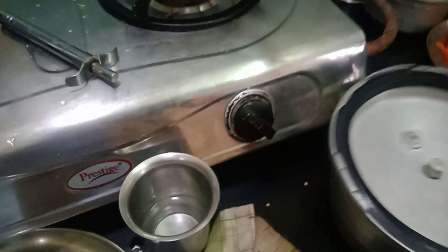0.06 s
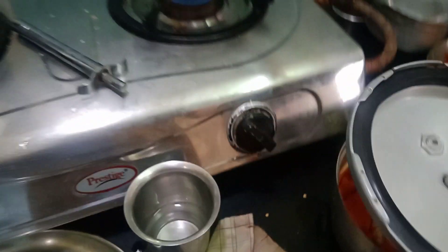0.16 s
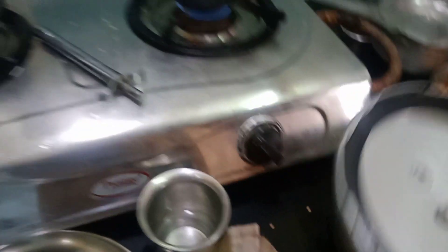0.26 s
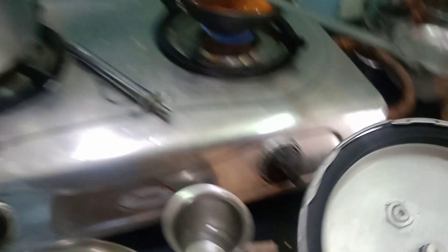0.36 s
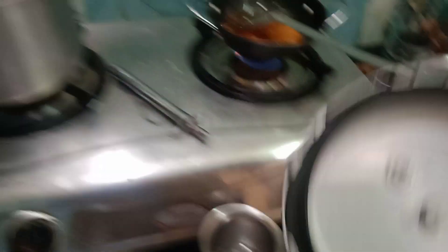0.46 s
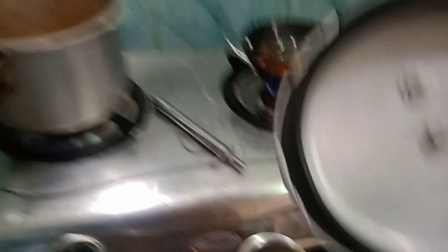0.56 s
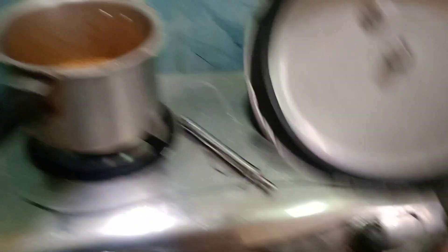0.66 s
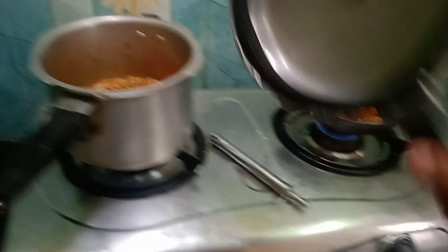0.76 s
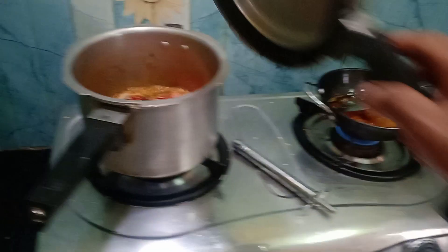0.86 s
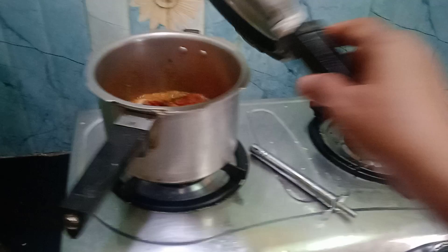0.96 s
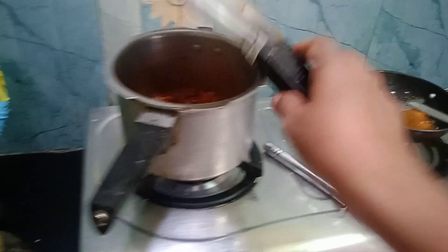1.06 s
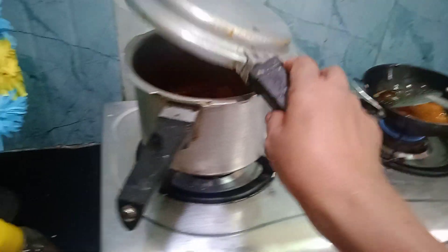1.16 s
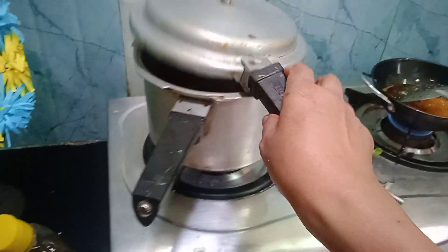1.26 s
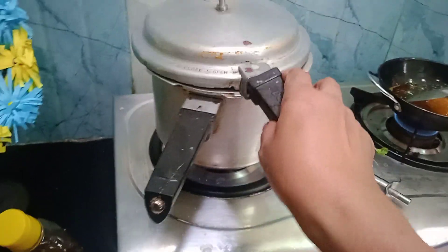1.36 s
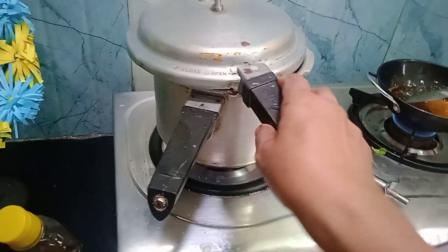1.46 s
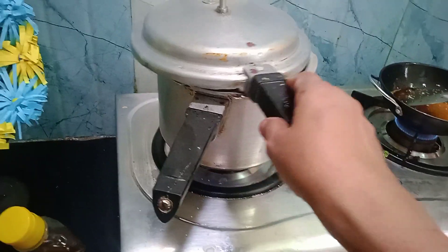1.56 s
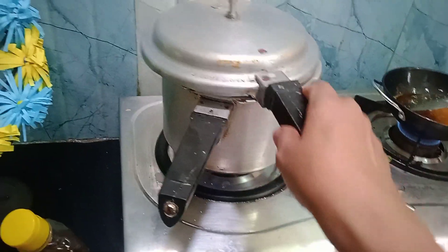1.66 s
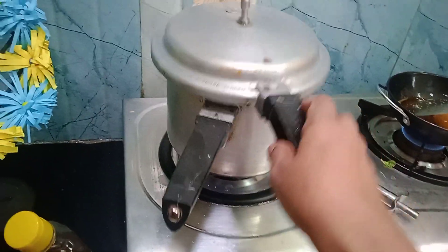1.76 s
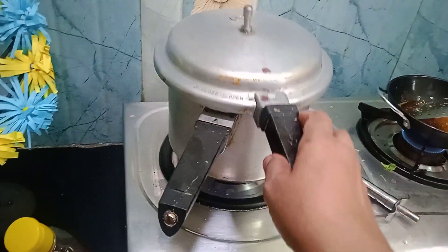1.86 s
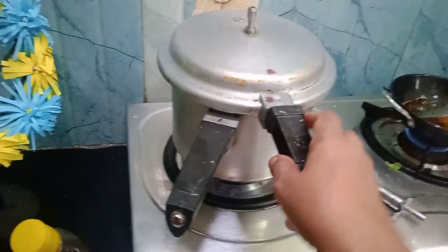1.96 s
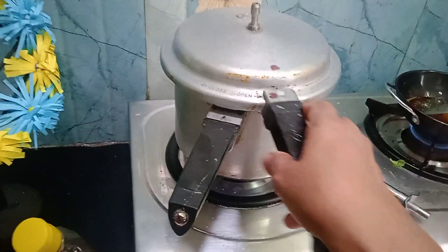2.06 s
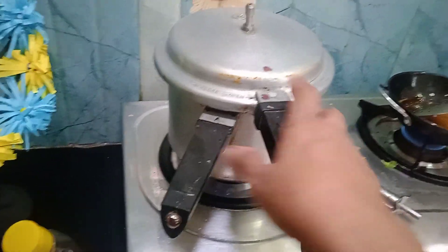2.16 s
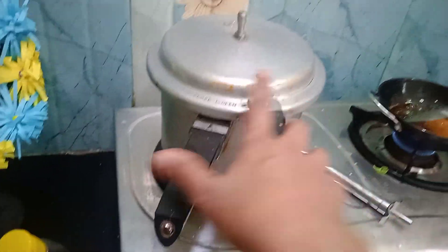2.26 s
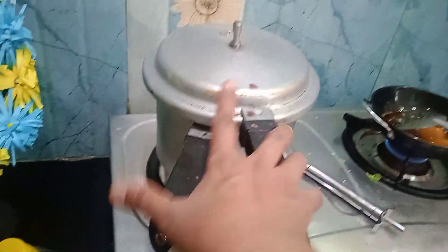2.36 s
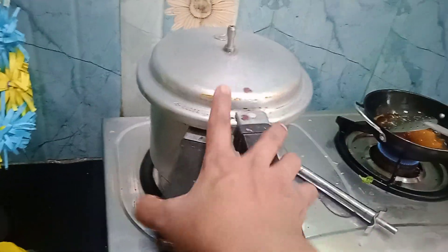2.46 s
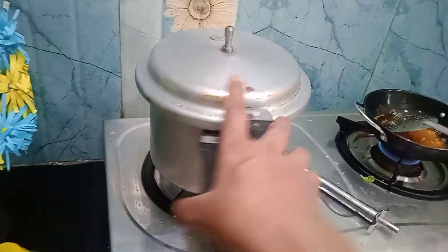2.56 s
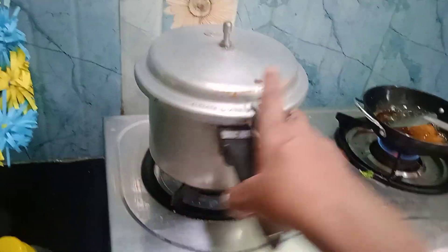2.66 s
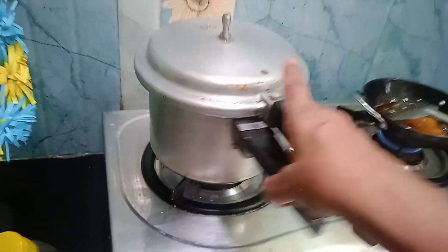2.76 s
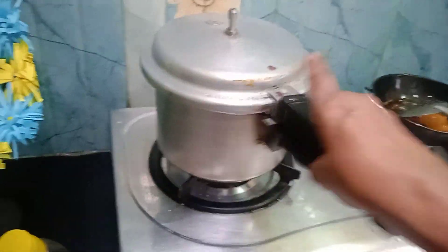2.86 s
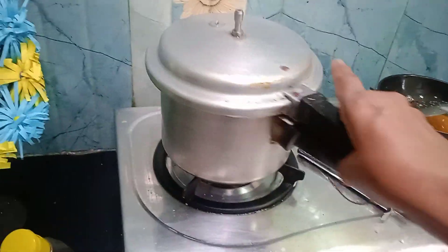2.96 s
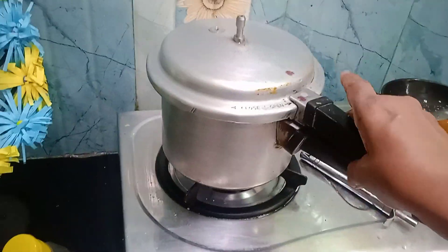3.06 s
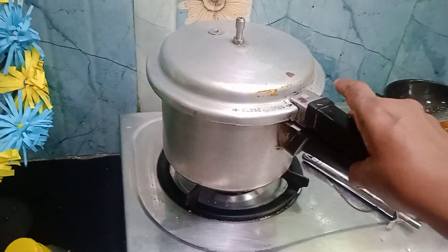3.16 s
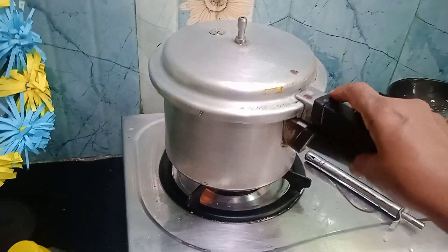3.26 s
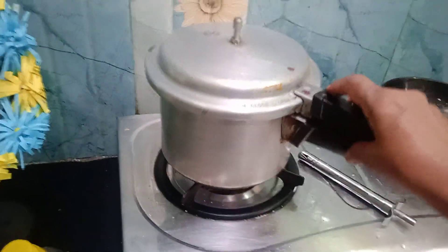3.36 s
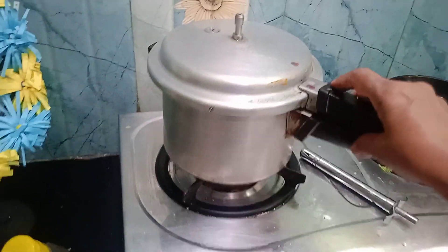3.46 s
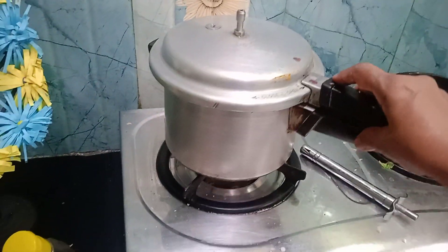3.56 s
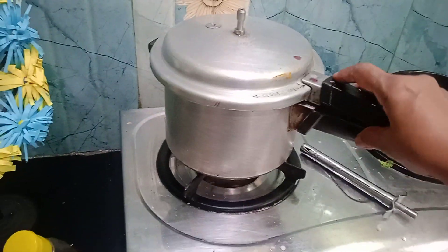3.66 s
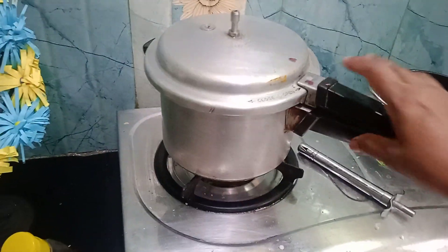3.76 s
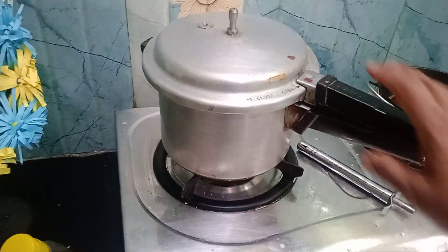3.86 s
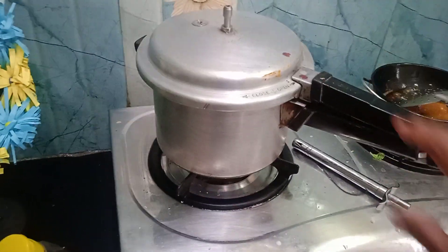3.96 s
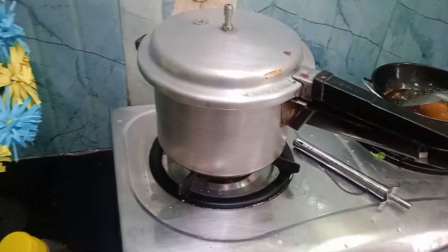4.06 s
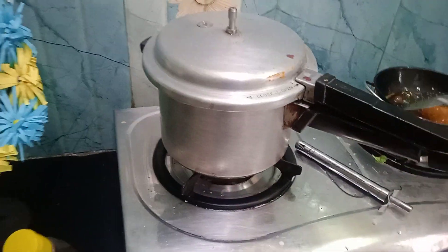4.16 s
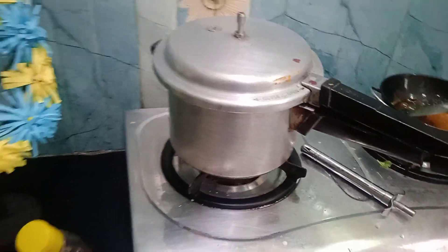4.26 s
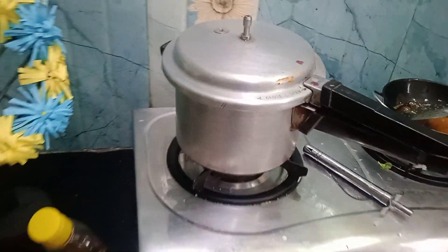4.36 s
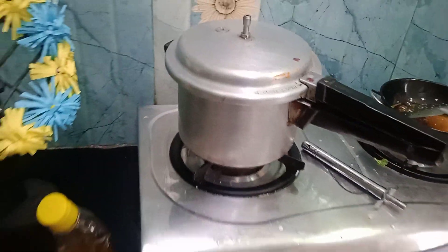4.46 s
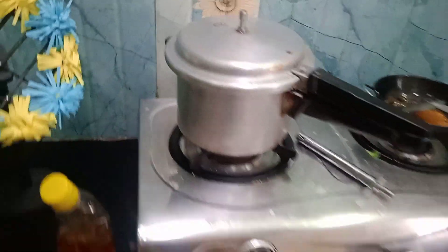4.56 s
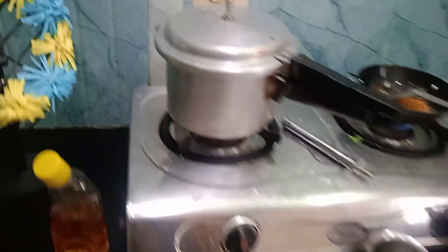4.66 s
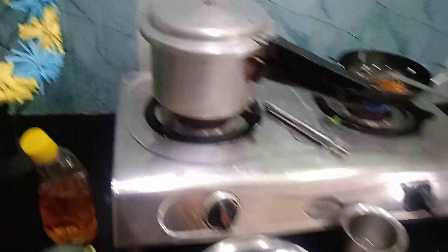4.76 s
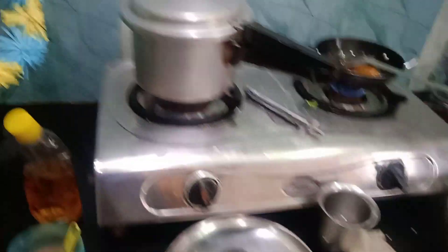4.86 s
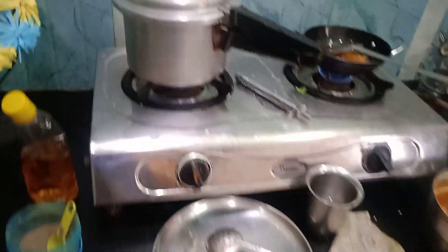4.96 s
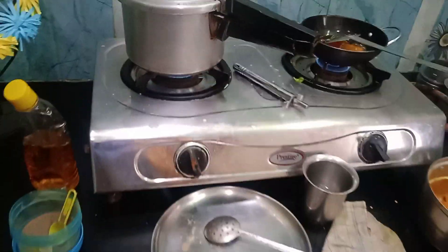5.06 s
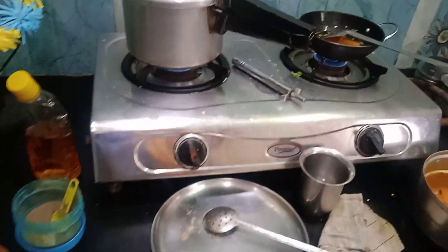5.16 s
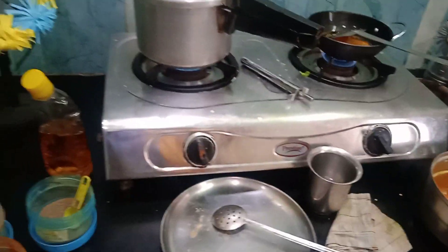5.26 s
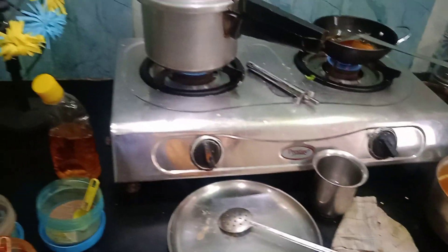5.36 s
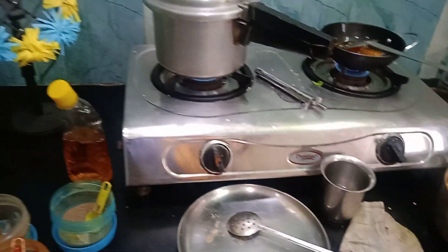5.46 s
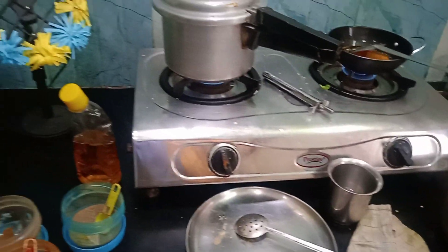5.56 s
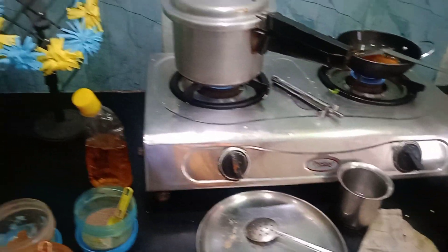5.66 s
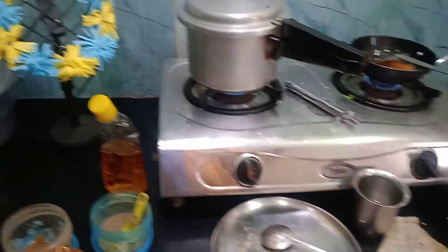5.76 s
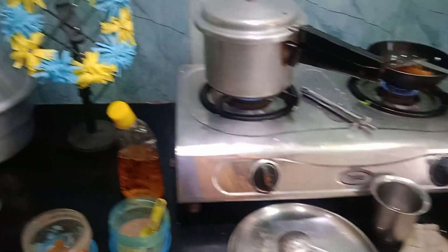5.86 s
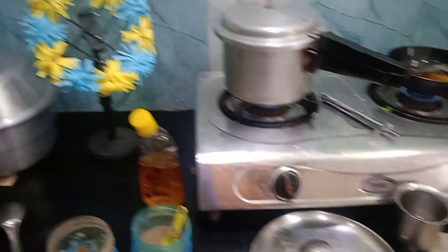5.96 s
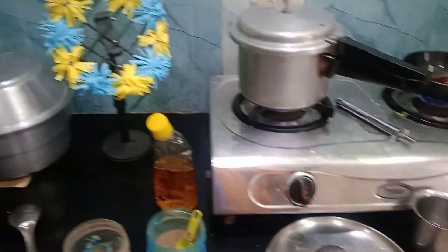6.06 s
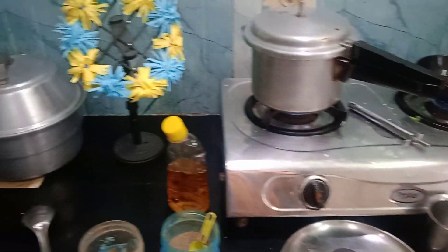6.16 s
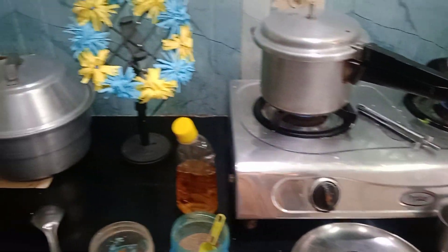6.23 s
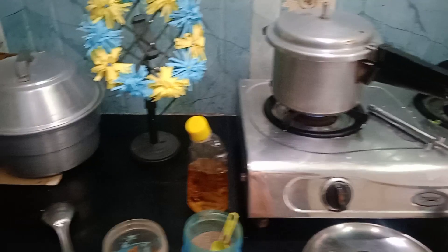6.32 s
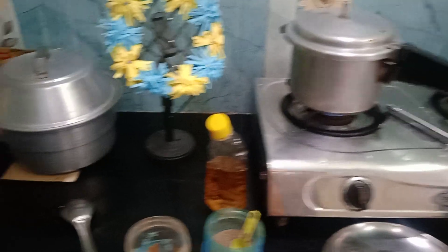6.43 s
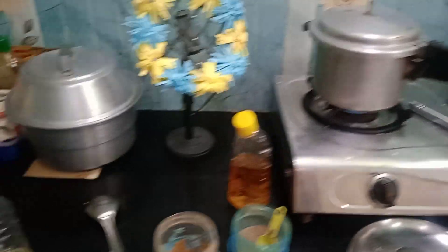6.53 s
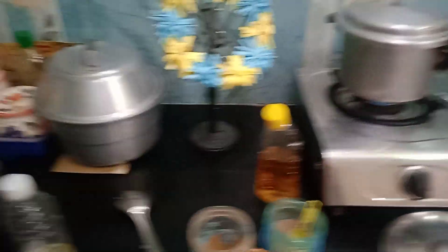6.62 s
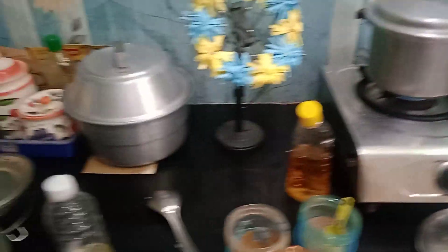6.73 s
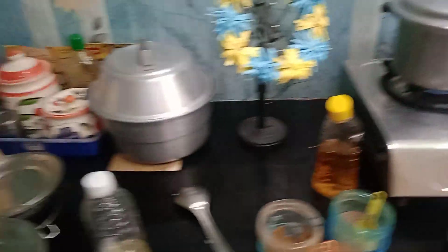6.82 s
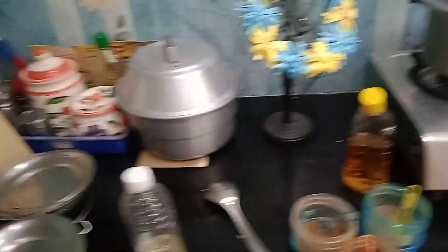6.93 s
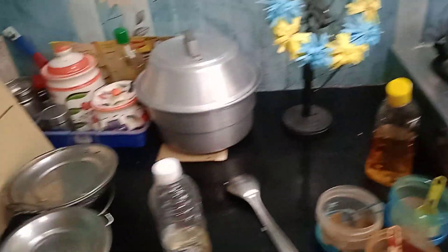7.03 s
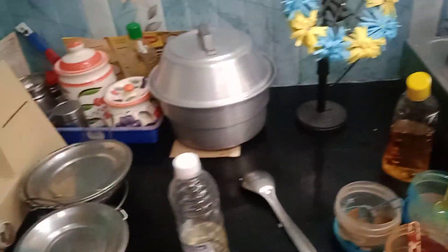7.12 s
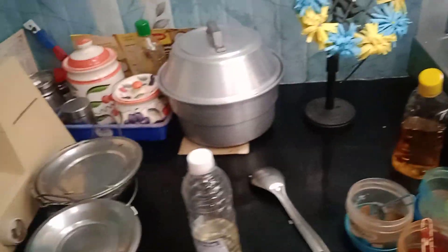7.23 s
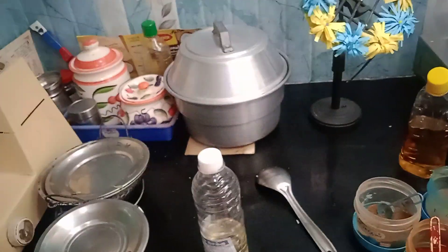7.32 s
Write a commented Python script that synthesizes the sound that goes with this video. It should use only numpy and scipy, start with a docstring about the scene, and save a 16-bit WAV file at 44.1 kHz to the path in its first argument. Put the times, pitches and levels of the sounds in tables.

```python
"""A small tiled kitchen: an aluminium pressure cooker lid is picked up, clanked onto its pot,
seated and twisted shut. Every blow rings the metal and the room; the lugs scrape, the rubber gasket
rubs and snaps, and the handles knock together. A pan sizzles on the next burner throughout,
over faint background noise and a few far-off knocks."""
import sys
import numpy as np
from scipy import signal
from scipy.fft import rfft, irfft, next_fast_len
from scipy.io import wavfile
from scipy.ndimage import uniform_filter1d

SR = 44100
rng = np.random.default_rng(int(sys.argv[2]) if len(sys.argv) > 2 else 0)


def inscribe(sig):
    """Save sig as 16-bit PCM at rate SR to the path in sys.argv[1].

    A 1-D sig is mono; a 2-D sig holds one channel per row.
    Samples are clipped to [-1, 1] before scaling.
    """
    pcm = np.round(np.clip(np.atleast_2d(sig).T, -1, 1) * 32767)
    wavfile.write(sys.argv[1], SR, pcm.astype(np.int16))


N = 325899
TAIL = 32000  # samples in one hit and its decay
T = np.arange(N) / SR
AGE = T[:TAIL]  # seconds since a hit


def undb(db):
    """Decibels to gain."""
    return 10 ** (np.asarray(db) / 20)


def unit(x):
    """Scale to rms 1."""
    return x / np.sqrt(np.mean(x ** 2) + 1e-30)


def freqs(x):
    """Frequencies of the spectrum of x, floored at 1 Hz."""
    return np.maximum(np.fft.rfftfreq(next_fast_len(len(x)), 1 / SR), 1)


def shape(x, gain):
    """Filter x by a gain for each frequency."""
    size = next_fast_len(len(x))
    return irfft(rfft(x, size) * gain, size)[:len(x)]


def colour(x, points):
    """EQ x along a curve of (Hz, dB) points."""
    hz, db = np.transpose(points)
    return shape(x, undb(np.interp(np.log(freqs(x)), np.log(hz), db)))


def noise_band(length, hz, width_hz):
    """Noise through one resonance, rms 1."""
    noise = rng.standard_normal(length)
    return unit(shape(noise, 1 / (1 + ((freqs(noise) - hz) / (width_hz / 2)) ** 2)))


def fade(t60_s):
    """Free decay, 60 dB down after t60_s."""
    return np.exp(-np.log(1000) * AGE / t60_s)


def swell(attack_s):
    """Rounded attack of a hit."""
    return 1 - np.exp(-AGE / attack_s)


def drift(rate_hz):
    """Slow random wander, spread near 1."""
    hold = int(SR / rate_hz)
    steps = np.repeat(rng.standard_normal(N // hold + 1), hold)
    return 1.2 * uniform_filter1d(steps, hold)[:N]


def clicks(per_s, spread_db):
    """Random tiny impacts, a few much stronger than the rest."""
    impacts = (rng.random(N) < per_s / SR) * rng.standard_normal(N)
    return unit(impacts * undb(spread_db * np.minimum(rng.exponential(size=N), 4)))


def add(out, start_s, sound):
    """Mix a sound in at a time."""
    i = max(int(start_s * SR), 0)
    out[i:i + len(sound)] += sound[:N - i]


def background_noise():
    """Faint low background noise that wavers unevenly, band by band."""
    # spectrum of the noise: freq_hz, level_db
    noise_eq = [(24, -43), (40, -17), (65, -1.5), (145, -4), (172, -2.5), (271, -2), (336, -1.5),
                (503, -16), (692, -7.5), (846, -3.5), (1200, -3), (1290, -8.5), (1500, -23.5), (2200, -20),
                (2860, -48), (4840, -120)]
    noise, out = colour(rng.standard_normal(N), noise_eq), 0
    octave = np.log2(freqs(noise))
    for centre in np.arange(5, 12, .5):
        band = shape(noise, np.maximum(1 - 2 * abs(octave - centre), 0))
        out += band * undb(8.2 * drift(rate_hz=5.8))
    return undb(-73.5) * unit(out)


def faint_tones():
    """Unsteady, breathy tones that come and go in the background."""
    # bands of pitched noise: start_s, end_s, pitch_hz, width_hz, level_db
    tones = [(0.28, 1.176, 565, 380, -68.5), (0.28, 1.174, 1566, 290, -70), (4.15, 4.691, 1010, 130, -79),
             (5.165, 5.9, 804, 47, -83.5), (5.85, 6.2, 4490, 1000, -63.5), (5.9, 7.377, 700, 75, -81.5),
             (5.101, 5.6, 147, 11, -85), (6.3, 7.0, 149.5, 13, -78)]
    out = 0
    for start_s, end_s, pitch_hz, width_hz, level_db in tones:
        gate = uniform_filter1d(1. * ((T > start_s) & (T < end_s)), size=4000)
        out += undb(level_db + 2.5 * drift(rate_hz=12)) * gate * noise_band(N, pitch_hz, width_hz)
    return out


def frying_pan():
    """A fine fizz of bursting bubbles with sharper spits, fading as the microphone drifts away."""
    # spectrum of the sizzle: freq_hz, level_db
    sizzle_eq = [(1060, -27), (1800, -14.5), (2650, -12.5), (2910, -9.5), (3430, -7), (4100, -7),
                 (4590, -4.5), (5930, 1.5), (6870, 1.5), (10600, -22.5), (13400, -23.5), (14000, -24)]
    level_db, fall_db_per_s = -54, 0.2845
    fizz = rng.standard_normal(N) * undb(.5 * drift(rate_hz=12))
    spits = undb(-7) * clicks(per_s=900, spread_db=1.5)
    return undb(level_db - fall_db_per_s * T) * unit(colour(fizz + spits, sizzle_eq))


def register_levels(strength_db, hardness_db, body_db):
    """Thump, low, mid, clang and bright in dB: hardness tilts them up, the hollow body lifts the middle."""
    tilt_db = hardness_db * np.array([-1.5, -.5, .5, 1.5])
    hollow_db = body_db * np.array([0, 1, .5, 0])
    return [strength_db - 18.5, *(strength_db + tilt_db + hollow_db)]


def metal_wash(levels_db):
    """Countless weak metal and room modes: each register has its own level and dies at its own pace."""
    # spectrum of the weak modes as the room returns them: freq_hz, level_db
    metal_eq = [(35, -81.5), (55, -24.5), (85, -11.5), (145, -24), (200, 4.5), (350, 5.5), (900, -4.5),
                (1900, -7.5), (2250, -11), (2650, -12.5), (3800, -17), (5200, -12), (7300, -12.5),
                (9500, -28.5), (14000, -40.5)]
    # registers from thump to bright: upper_edge_hz, t60_s
    registers = [(150, 0.23), (450, 0.72), (1200, 0.59), (3000, 0.37), (20000, 0.39)]
    bunch_db, bunch_hz = 3.5, 30  # the modes bunch unevenly along the spectrum
    crack_db, crack_s = 5.5, 0.0049  # the direct sound briefly stands above the room
    dense = colour(rng.standard_normal(TAIL), metal_eq)
    hz, below, out = freqs(dense), 0, 0
    bunching = undb(bunch_db * np.interp(hz / bunch_hz, np.arange(TAIL), rng.standard_normal(TAIL)))
    for (upper_edge_hz, t60_s), level_db in zip(registers, levels_db):
        lowpass = 1 / (1 + (hz / upper_edge_hz) ** 8)
        register = unit(shape(dense, bunching * (lowpass - below)))
        out += undb(level_db) * register * fade(t60_s)
        below = lowpass
    return out * (1 + undb(crack_db) * np.exp(-AGE / crack_s))


def far_knocks():
    """Small things touched across the kitchen, heard mostly as room, and one utensil clink."""
    # light knocks: start_s, strength_db, hardness_db, body_db
    touches = [(0.825, -68.5, 6.5, 6.5), (4.604, -71, 11.5, -6), (5.312, -77, 14.5, 4),
               (6.488, -67.5, 10.5, 2.5)]
    # resonances of the utensil: start_s, level_db, pitch_hz, width_hz
    clinks = [(5.308, -55.5, 1500, 453), (5.308, -55, 4000, 500)]
    out = np.zeros(N)
    for start_s, strength_db, hardness_db, body_db in touches:
        wash = metal_wash(register_levels(strength_db, hardness_db, body_db))
        add(out, start_s, wash * swell(attack_s=0.0052))
    for start_s, level_db, pitch_hz, width_hz in clinks:
        add(out, start_s, undb(level_db) * noise_band(TAIL, pitch_hz, width_hz) * fade(t60_s=0.37))
    return out


def low_note(pitch_hz, t60_s, attack_s):
    """One low mode pushed softly."""
    return np.sin(2 * np.pi * pitch_hz * AGE) * fade(t60_s) * swell(attack_s)


def stove_booms():
    """A shove on the pot booms the stove top."""
    # modes of the stove top: pitch_hz, level_db, t60_s
    modes = [(83, -3, 0.33), (99.8, -2, 0.43)]
    # shoves against the stove: start_s, level_db
    shoves = [(0.156, -47.5), (2.549, -51.5), (2.906, -35), (3.05, -48), (3.852, -56.5)]
    boom = sum(undb(db) * low_note(hz, t60_s, attack_s=0.0031) for hz, db, t60_s in modes)
    out = np.zeros(N)
    for start_s, level_db in shoves:
        add(out, start_s, undb(level_db) * boom)
    return out


def handling_bumps():
    """Dull, hand-damped knocks on the lid, each sounding one low note."""
    # hollow bumps: start_s, level_db, pitch_hz, t60_s
    bumps = [(0.004, -34.5, 281, 0.11), (0.026, -24, 272, 0.051), (0.09, -37, 352, .15),
             (0.121, -24.5, 440, .05), (0.15, -25.5, 251, 0.03), (1.927, -27.5, 184, 0.065),
             (2.907, -23, 184, 0.11)]
    out = np.zeros(N)
    for start_s, level_db, pitch_hz, t60_s in bumps:
        add(out, start_s, undb(level_db) * low_note(pitch_hz, t60_s, attack_s=0.0023))
    return out


def cooker_ring(favoured_hz, lift_db):
    """The strong modes, beating as close pairs do; the place of contact favours those near one pitch."""
    # modes of the cooker: pitch_hz, level_db, t60_s
    modes = [(208, -14, .45), (290, -12, .55), (320, -7, .5), (339, -1, .6), (411, -10, .5), (458, -7, .6),
             (525, -12, .5), (563, -9, .6), (600, -13, .5), (675, -13, .5), (766, -11, .5), (851, -13, .5),
             (985, -12, .5), (1062, -11, .45), (1140, -14, .45), (1319, -15, .45), (1510, -12, .45),
             (1787, -13, .3), (2003, -11, .35), (2445, -10, .35), (2570, -16, .35), (2610, -11, .42),
             (2683, -12, .42), (2993, -19, .35), (3187, -19, .3), (4985, -13, .3), (5475, -17, .35),
             (6074, -13, .33), (6180, -9, .33), (7160, -11, .33)]
    favour_octaves, beat_depth, pair_split = 0.093, 0.12, 0.005
    out = 0
    for (pitch_hz, level_db, t60_s), (phase, spread, beat_phase) in zip(modes, rng.random((len(modes), 3))):
        favour_db = lift_db * np.exp(-.5 * (np.log2(pitch_hz / favoured_hz) / favour_octaves) ** 2)
        beat_hz = pitch_hz * pair_split * (.5 + spread)
        beat = 1 + beat_depth * np.sin(2 * np.pi * (beat_hz * AGE + beat_phase))
        partial = np.sin(2 * np.pi * (pitch_hz * AGE + phase))
        out += undb(level_db + favour_db) * fade(t60_s) * beat * partial
    return out


def stroke_force(strokes, attack_s, release_s):
    """Envelope of sliding strokes: each sets in, tightens or eases at a steady rate, and lets go."""
    out = 0
    for start_s, end_s, level_db, rise_db_per_s in strokes:
        age = np.clip(T - start_s, 0, end_s - start_s)
        attack = 1 - np.exp(-age / attack_s)
        release = np.exp(-np.maximum(T - end_s, 0) / release_s)
        out += undb(level_db + rise_db_per_s * age) * attack * release
    return out


def friction(force, slips, body):
    """Stick-slip pulses ring the cooker as long as the lid turns."""
    return signal.fftconvolve(slips * force, body / np.linalg.norm(body))[:N]


def gasket_rub():
    """The rubber gasket judders dully as it drags on the rim."""
    # drags: start_s, end_s, level_db, rise_db_per_s
    drags = [(2.37, 2.53, -62.5, -4), (2.67, 2.92, -52.5, 31), (3.3, 3.64, -46.5, -32.5)]
    force = stroke_force(drags, attack_s=0.021, release_s=0.01)
    slips = clicks(per_s=400, spread_db=1.5)
    return friction(force, slips, metal_wash(levels_db=[-2.5, -1, 4, -17.5, -2]))


def gasket_snaps():
    """The gasket snaps free: a short high chirp, then its reflections from the tiles."""
    # snaps: start_s, chirp_db, echo_db, pitch_hz, width_hz
    snaps = [(2.6487, -18, -33.5, 4890, 1246), (3.389, -27, -42.5, 5800, 1700),
             (3.404, -37, -52, 6000, 1760)]
    half_length_s = 0.00076
    out = np.zeros(N)
    for start_s, chirp_db, echo_db, pitch_hz, width_hz in snaps:
        chirp = np.sin(2 * np.pi * pitch_hz * AGE) * np.exp(-(AGE / half_length_s - 2) ** 2)
        echo = noise_band(TAIL, pitch_hz, width_hz) * fade(t60_s=0.28)
        add(out, start_s, undb(chirp_db) * chirp + undb(echo_db) * echo)
    return out


def lug_grind():
    """Metal lugs grind brightly under the rim as the grip tightens; the finest roughness adds a rasp."""
    # the locking turn: start_s, end_s, level_db, rise_db_per_s
    turn = [(2.9, 3.085, -38.5, 33)]
    force = stroke_force(turn, attack_s=0.0047, release_s=0.0098)
    slips = clicks(per_s=900, spread_db=4.5)
    wash = metal_wash(levels_db=[-28, -5, 2, 0, 3])
    ring = undb(-13) * cooker_ring(favoured_hz=546, lift_db=19)
    rasp = undb(-30.5) * force * noise_band(N, hz=10600, width_hz=5000)
    return friction(force, slips, wash + ring) + rasp


def lid_clanks():
    """Lid against rim, lug against lug, handle against handle: each blow rings metal and room."""
    # blows on lid and pot: start_s, strength_db, hardness_db, body_db, favoured_hz, lift_db
    blows = [ (0.0243, -46.5, -1.5, -5, 1234, 17), (0.149, -52, -0.5, -9.5, 290, 25.5),
             (1.135, -45, 3.5, 14.5, 550, 30), (1.1355, -44, 2, 7.5, 1277, 27.5),
             (1.2535, -40.5, 4.5, 0.5, 2930, 22.5), (1.365, -35, 2, 1.5, 2584, 23),
             (1.3718, -30, 2, -10.5, 5800, 9.5), (1.491, -44.5, 0.5, -6, 2630, 3.5),
             (1.553, -47.5, 3, 5.5, 4985, 13), (1.667, -53, -3, -2, 2630, 16.5),
             (1.703, -40, 0.5, -6.5, 302, 10), (1.766, -42, -3, -5, 2630, 15.5),
             (1.779, -43.5, 1, 3.5, 330, 14.5), (1.822, -43, -1, -8, 339, 6.5),
             (1.85, -50, -1.5, -4, 1062, 20.5), (1.924, -55.5, 2.5, 5, 2610, 13.5),
             (2.123, -56.5, 1, -1.5, 208, 15), (2.54, -45.5, -2, 4.5, 770, 27.5),
             (2.549, -41, -0.5, 0.5, 564, 18.5), (2.895, -49, 4, 3, 2003, 18),
             (2.906, -39, -1, 2.5, 1062, 10.5), (3.015, -49.5, -3.5, 9, 339, 18.5),
             (3.043, -39.5, 1.5, -3.5, 334, 13.5), (3.366, -55, 4, -2, 4985, 23),
             (3.823, -53, -2.5, -6, 776, 19.5), (3.845, -46.5, 1.5, 0.5, 316, 11.5), ]
    # an edge strikes sharply, the face that lands just after it softly
    edge_attack_s, face_attack_s, face_within_s = 0.0007, 0.001, .03
    seated_s, gasket_t60_s = 1.6, 0.98  # once the lid is seated, the rubber drains the ring
    radiate_hz = 125  # the small lid radiates little below this
    out, previous_s = np.zeros(N), -1
    for start_s, strength_db, hardness_db, body_db, favoured_hz, lift_db in blows:
        attack_s = face_attack_s if start_s - previous_s < face_within_s else edge_attack_s
        damping = fade(gasket_t60_s) if start_s > seated_s else 1
        wash = metal_wash(register_levels(strength_db, hardness_db, body_db))
        ring = undb(strength_db - 1.5) * damping * cooker_ring(favoured_hz, lift_db)
        add(out, start_s, (wash + ring) * swell(attack_s))
        previous_s = start_s
    return signal.sosfilt(signal.butter(2, radiate_hz, "high", fs=SR, output="sos"), out)


def scene():
    """The cooker and the kitchen around it, in mono."""
    hits = lid_clanks() + handling_bumps() + stove_booms()
    distant = faint_tones() + far_knocks()
    twist = lug_grind() + gasket_rub() + gasket_snaps()
    return (hits + distant + twist + frying_pan() + background_noise())[None]


def record(dry):
    """The microphone drops the deep bass; its port resonates in the top octave, under a steep high cut."""
    low_cut_hz, high_cut_hz = 61, 15900
    port_hz, port_width_hz, port_db = 15030, 310, 17
    sound = signal.sosfilt(signal.butter(4, low_cut_hz, "high", fs=SR, output="sos"), dry[0])
    port = undb(port_db * np.exp(-.5 * ((freqs(sound) - port_hz) / port_width_hz) ** 2))
    high_cut = signal.ellip(10, .2, 70, high_cut_hz, fs=SR, output="sos")
    return signal.sosfilt(high_cut, shape(sound, port))[None]


dry = scene()
out = record(dry)
inscribe(out)
```